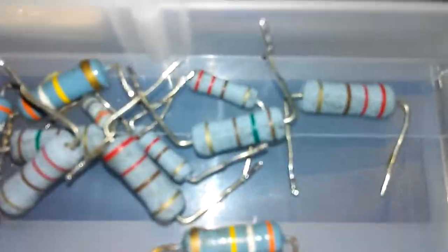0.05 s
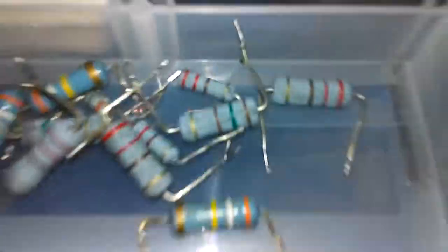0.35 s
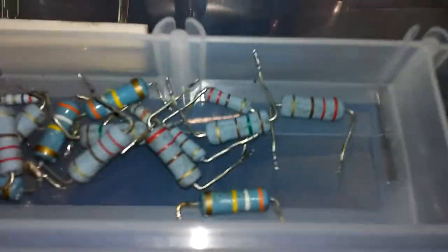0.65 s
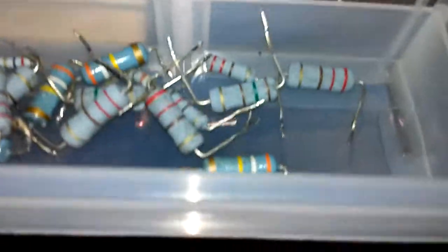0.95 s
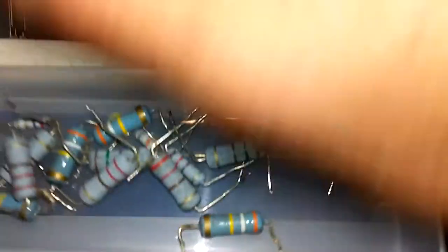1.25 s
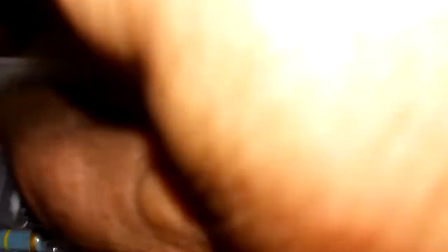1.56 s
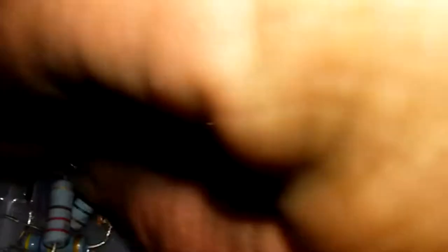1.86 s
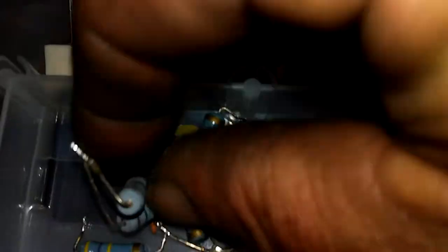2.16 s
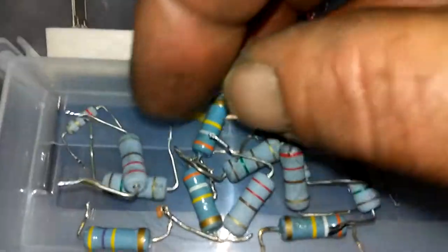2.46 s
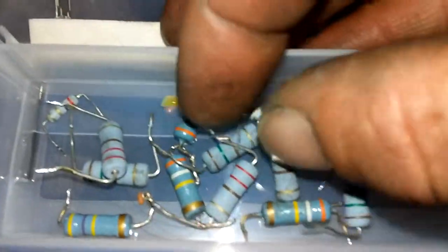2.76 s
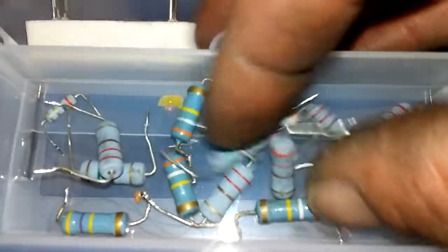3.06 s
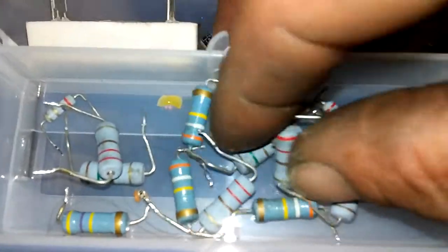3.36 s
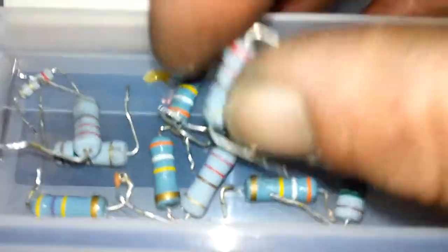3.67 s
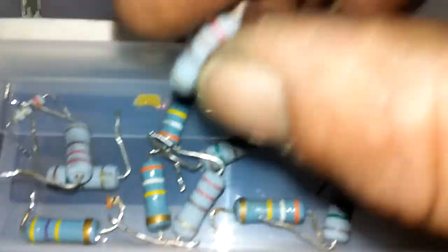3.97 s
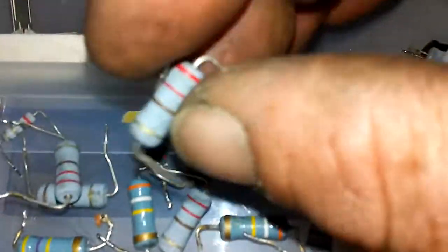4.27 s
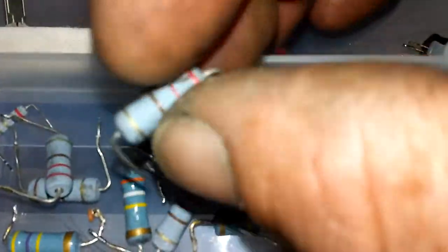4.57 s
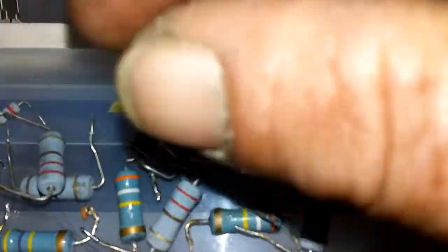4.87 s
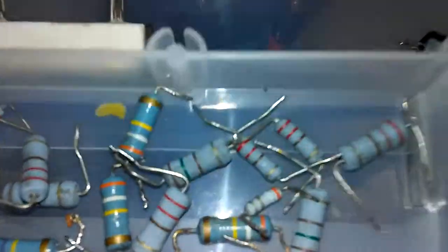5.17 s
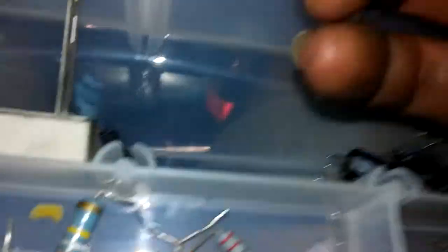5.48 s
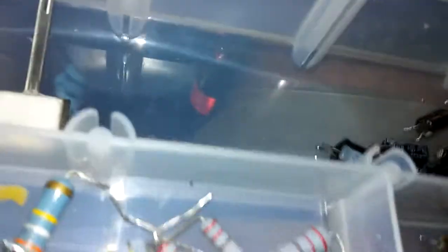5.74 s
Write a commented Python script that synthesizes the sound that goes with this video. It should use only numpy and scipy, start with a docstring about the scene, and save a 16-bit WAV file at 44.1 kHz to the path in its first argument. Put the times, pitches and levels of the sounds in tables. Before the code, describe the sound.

Fingers stir ceramic resistors in a small plastic box, making close clicks, rattles and wiry scratches, then one drops back in.

```python
"""First you hear a low, fan-like drone in a small room, with a faint hiss. Then fingers sort through
ceramic resistors in a small plastic box, close to the microphone. The resistors knock on each other
and make the box ring, their wire leads scratch and buzz, and the box thuds softly on the table.
At the end one resistor is dropped back and bounces."""
import sys
import numpy as np
from scipy import signal
from scipy.fft import rfft, irfft, next_fast_len
from scipy.io import wavfile

SR = 44100
rng = np.random.default_rng(int(sys.argv[2]) if len(sys.argv) > 2 else 0)


def transcribe(signal):
    """Save signal, clipped to [-1, 1], as a 16-bit WAV file at the path in sys.argv[1]."""
    frames = np.atleast_2d(signal).T
    limited = np.clip(frames, -1, 1)
    pcm = np.round(limited * 32767).astype(np.int16)
    wavfile.write(sys.argv[1], SR, pcm)


N = 265041
TIME = np.arange(N) / SR


def from_db(db):
    """Turn decibels into a number to multiply by."""
    return np.exp(np.asarray(db) * (np.log(10) / 20))


def rms_one(x):
    """Scale a sound so that its average level (rms) is one."""
    return x / np.sqrt(np.mean(x ** 2) + 1e-20)


def level_curve(rows):
    """Join points of (seconds, dB) into a gain for every sample."""
    return from_db(np.interp(TIME, *np.transpose(rows)))


def add(out, start_s, sound):
    """Mix a sound in at a given time."""
    start = int(round(start_s * SR))
    out[start:start + len(sound)] += sound[:N - start]


def band(x, low_hz, high_hz):
    """Keep what lies between two frequencies."""
    return signal.sosfilt(signal.butter(3, [low_hz, high_hz], "band", fs=SR, output="sos"), x)


def noise(spectrum, size):
    """Noise of level one, coloured by points of (Hz, dB)."""
    hz, db = np.transpose(spectrum)
    padded = next_fast_len(size)
    bins_hz = np.maximum(np.fft.rfftfreq(padded, 1 / SR), 1)
    colour = from_db(np.interp(np.log(bins_hz), np.log(hz), db))
    return rms_one(irfft(rfft(rng.standard_normal(padded)) * colour, padded)[:size])


def fade(t, t60):
    """Die away by 60 dB in t60 seconds."""
    return np.exp(-np.log(1000) * t / t60)


def ring(clicks, hz, t60):
    """Each click starts a pure tone that dies away."""
    decay, angle = from_db(-60 / (t60 * SR)), 2 * np.pi * hz / SR
    return signal.lfilter([0, np.sin(angle)], [1, -2 * decay * np.cos(angle), decay ** 2], clicks + 1e-18)


# The colour of the hiss. Each row: frequency in Hz, relative level in dB.
HISS_COLOUR = [(100, -2.5), (2000, 3), (4000, -1.5), (6700, -3), (8500, -8.5), (10000, -8), (12500, -4.5),
               (15500, -4), (17000, -21)]


def hiss(level_db):
    """The microphone adds a steady hiss of its own."""
    return from_db(level_db) * noise(HISS_COLOUR, N)


# The colour of the drone. Each row: frequency in Hz, relative level in dB.
DRONE_COLOUR = [(20, -23), (40, -18), (65, -3), (100, -3), (160, -1.5), (205, 0.5), (255, 5), (310, -7),
                (380, -4.5), (550, -11.5), (800, -12.5), (1500, -21), (3000, -46.5), (8000, -55)]
# How loud the drone and its hum are. Each row: time in seconds, level in dB.
DRONE_LEVELS = [(0, -54), (.8, -52.5), (2, -51), (3.8, -51), (4.85, -52.5), (5.2, -48), (5.6, -49),
                (6, -46.5)]
HUM_LEVELS = [(0, -53), (.3, -55), (.5, -60), (1, -56), (2, -67.5), (4.5, -66), (5.3, -51), (6, -70.5)]


def room_drone(hum_hz, waver_hz):
    """A low, fan-like rush, with a band of noise so narrow that it sounds like a wavering hum."""
    rush = noise(DRONE_COLOUR, N)
    hum = band(rng.standard_normal(N + SR), hum_hz - waver_hz, hum_hz + waver_hz)
    hum = rms_one(hum[SR:])   # skip the second in which it builds up
    return level_curve(DRONE_LEVELS) * rush + level_curve(HUM_LEVELS) * hum


# The colour of the echoes. Each row: frequency in Hz, relative level in dB.
ECHO_COLOUR = [(200, 21), (600, 1), (1200, 6), (2200, 1), (4000, 10), (7000, -1), (11000, -2.5),
               (16000, -8)]


def echoes(x, near_db, near_t60, room_db, room_t60, size=18000):
    """Sound bounces quickly off the box and the table, then lingers faintly in the room."""
    t = np.arange(size) / SR
    arrival = np.clip(t / 0.0014 - 1, 0, 1)   # nothing comes back for 1.4 ms
    response = 0
    for db, t60 in ((near_db, near_t60), (room_db, room_t60)):
        tail = noise(ECHO_COLOUR, size) * fade(t, t60) * arrival
        response += from_db(db) * tail / np.linalg.norm(tail)
    return signal.fftconvolve(x, response)[:N]


# Thuds of the box. Each row: start in seconds, peak level in dB, lowest and highest frequency in Hz.
BUMPS = [(1.134, -37, 200, 410), (1.243, -36, 400, 557), (1.51, -32.5, 74, 312), (1.865, -35, 135, 280),
         (2.352, -43, 74, 260), (3.209, -33, 19, 188)]


def box_bumps(t60, size=6000):
    """A finger pushes the whole box against the table: a soft, dull thud."""
    out, t = np.zeros(N), np.arange(size) / SR
    for start_s, db, low_hz, high_hz in BUMPS:
        thud = band(rng.standard_normal(size) * fade(t, t60), low_hz, high_hz)
        add(out, start_s, from_db(db) * thud / np.abs(thud).max())
    return out


# Thin, bright tings. Each row: start in seconds, pitch in Hz, level in dB, ring time in seconds.
TINGS = [(1.554, 5300, -16, 0.027), (1.554, 6300, -18, 0.048), (1.718, 12700, -42, 0.078),
         (2.004, 10200, -50, 0.21), (2.025, 6820, -37, .12), (2.305, 9360, -59, 0.37),
         (2.816, 13900, -49, .09), (2.836, 13500, -48, .08), (3.192, 6960, -27, 0.027),
         (3.34, 5900, -52, 0.023), (4.93, 6700, -14, 0.013), (4.929, 11650, -29.5, 0.019),
         (4.942, 10700, -41.5, 0.057), (4.961, 9600, -50, 0.022)]


def bright_tings(buzz_hz, size=9000):
    """Narrow bands of fading noise: buzzing wires and the sharp top of the dropped resistor's bounces."""
    out, t = np.zeros(N), np.arange(size) / SR
    for start_s, hz, db, t60 in TINGS:
        ting = rms_one(band(rng.standard_normal(size), hz - buzz_hz, hz + buzz_hz))
        add(out, start_s, from_db(db) * ting * fade(t, t60))
    return out


# The heap rustling under resting fingers. Each row: time in seconds, level in dB, brightness in dB.
RUSTLE = [(0.95, -75.5, -10), (1.11, -49.5, -7), (1.3, -54.5, -10), (1.55, -47, -7), (1.75, -49, -4),
          (1.98, -40.5, -4), (2.32, -40, -5.5), (2.57, -57, -9), (2.84, -42.5, -8), (2.99, -58, -11),
          (3.2, -54.5, -9), (3.55, -49, -5.5), (3.94, -50.5, -10), (4.02, -67, -6), (6, -66, -6)]
# Short bursts of scraping: finger pushes and the rattle of the dropped resistor.
# Each row: start and length in seconds, level in dB, brightness in dB.
SCRAPES = [(1.146, .045, -42, -5), (1.335, .016, -39, -17), (1.405, 0.022, -39.5, -7),
           (1.439, .035, -30.5, -10), (1.503, .075, -24.5, -4.5), (1.584, 0.017, -39, 7),
           (1.665, .018, -38, -10), (1.71, .02, -35, -12), (2.089, .035, -33, -7.5), (2.193, .042, -26, -4),
           (2.335, .1, -32.5, -5), (2.678, .05, -38, -17), (2.738, .03, -28.5, -9.5), (2.783, .02, -38, -3),
           (2.824, .036, -27.5, -5.5), (3.062, .016, -44.5, -9.5), (3.093, .012, -35, -15),
           (3.176, .047, -27, -7), (3.292, 0.02, -32.5, 0.5), (3.345, .03, -38, -3),
           (3.421, 0.03, -30.5, -6), (3.473, .026, -38, -2), (3.569, .048, -36, -5.5),
           (3.631, .035, -32.5, -13), (3.738, .024, -30.5, -16), (4.326, 0.087, -52.5, -8),
           (4.466, .055, -51, -1.5), (4.926, .036, -36.5, -6), (5.227, 0.039, -50.5, -2),
           (5.304, .05, -55, -3), (5.572, .05, -51, -3.5), (5.817, .05, -50, -3), (5.9, .09, -52, -15)]


def stirring(rise_db_per_s, fall_db_per_s, points=6000):
    """Level and brightness of the rubbing, in dB: scrapes rise fast and fade slower, over the rustle."""
    t = np.linspace(0, TIME[-1], points)
    times, *columns = np.transpose(RUSTLE)
    rustle_db, rustle_bright_db = [np.interp(t, times, column) for column in columns]
    power, treble = from_db(rustle_db) ** 2, from_db(rustle_db + rustle_bright_db) ** 2
    for start_s, length_s, db, bright_db in SCRAPES:
        drop_db = np.maximum(rise_db_per_s * (start_s - t), fall_db_per_s * (t - start_s - length_s))
        scrape = from_db(db - np.clip(drop_db, 0, 100)) ** 2
        power += scrape
        treble += scrape * from_db(bright_db) ** 2
    return [np.interp(TIME, t, 10 * np.log10(curve)) for curve in (power, treble / power)]


# Where the box floor, the walls and the ceramic ring. Each row: lowest and highest pitch in Hz.
ZONES = [(400, 1400), (1400, 3000), (3000, 16000)]
# The filled box's own tones (modes). Each row: pitch in Hz, relative level in dB, ring time in seconds.
BOX_MODES = [(450, -18.5, 0.025), (615, -11, 0.12), (693, -9.5, 0.027), (766, -8, 0.025),
             (1084, 6.5, 0.019), (1257, 11, 0.015), (1562, 8, 0.011), (1785, 1, 0.02), (1981, 0, 0.032),
             (2254, 3, 0.019), (2450, -4.5, 0.04), (2930, -14.5, 0.016), (3000, 11.5, 0.0052),
             (3587, 2.5, 0.017), (4360, 0, 0.016), (4710, -1.5, 0.0079), (5170, -12.5, 0.026),
             (5470, -1, 0.0047), (6050, 1.5, 0.012), (6830, -9.5, 0.021), (6840, -2, 0.011),
             (6800, -3.5, 0.016), (8000, -1.5, 0.0052), (9530, -7.5, 0.0065), (9620, -18.5, 0.0051),
             (12500, -18.5, 0.0049), (13800, -17.5, .008)]


def modes_in(low_hz, high_hz):
    """The tones that belong to one zone."""
    return [mode for mode in BOX_MODES if low_hz <= mode[0] < high_hz]


def nearness_db(hz, spot_hz, db_per_octave):
    """A wall's tones ring most when they lie near the pitch of the touched spot."""
    low, high = ZONES[1]
    octaves_away = np.abs(np.log2(hz / np.clip(spot_hz, low, high)))
    return -db_per_octave * octaves_away * (low <= hz < high)


def scratching(stir_db, bright_db, catches_per_s, friction_db, floor_db, walls_db, ceramic_db,
               finger_damping, points=120, jerks=1300):
    """Wires and resistors slip over the plastic in tiny catches, with a fine rubbing hiss between."""
    moments = np.linspace(0, TIME[-1], points)
    spot_hz = np.interp(moments, *np.transpose(KNOCKS)[:2])   # the fingers rub where they knock
    caught = rng.random(N) < catches_per_s / SR
    catches = caught * from_db(3.5 * np.minimum(rng.exponential(1, N), 3))
    # the heap gives way in little jerks, so the catches come in clumps
    clumps = np.interp(TIME, np.linspace(0, TIME[-1], jerks), rng.standard_normal(jerks))
    force = (rms_one(catches) + from_db(friction_db)) * from_db(3 * np.clip(clumps, -2, 2))
    out = np.zeros(N)
    for (low, high), zone_db in zip(ZONES, (floor_db, walls_db, ceramic_db + bright_db)):
        zone = 0
        for hz, db, t60 in modes_in(low, high):
            wander_db = 2.8 * rng.standard_normal(points)   # tones swell and fade as the contacts move
            wire_db = 3.5 * max(np.log2(hz / 6000), 0)   # thin wires favour the highest tones
            gain = from_db(db + wire_db + wander_db + nearness_db(hz, spot_hz, db_per_octave=5.5))
            tone = ring(force * rng.standard_normal(N), hz, t60 / finger_damping)
            zone += np.interp(TIME, moments, gain) * tone
        out += from_db(stir_db + zone_db) * rms_one(band(zone, low, high))
    return out


def jostles(stir_db, count, centre_hz, still_db):
    """Small chance knocks, as rows like KNOCKS: harder stirring makes them likelier and louder."""
    stillness_db = np.minimum(stir_db - still_db, 0)   # under a light touch the heap lies still
    chance = np.cumsum(from_db(0.5 * stir_db + stillness_db))
    times = np.interp(rng.random(count), chance / chance[-1], TIME)
    pitch, strength, hardness = np.clip(rng.standard_normal((count, 3)), -2, 2).T
    spot_hz = centre_hz * 2 ** (0.27 * pitch)
    knock_db = -7.5 + 0.79 * np.interp(times, TIME, stir_db) + 2 * strength
    tick_db = -5.5 + 2.5 * hardness
    return np.column_stack([times, spot_hz, knock_db, tick_db])


def chatter(times, sounds, gap_s=0.0038, loss_db=12.5, touches=3):
    """A resistor rattles against what it hit: quick, uneven touches, each weaker than the last."""
    out = np.zeros(N)
    for start_s, sound in zip(times, sounds):
        for touch, stretch in enumerate(rng.uniform(.5, 1.5, touches)):
            add(out, start_s, from_db(-loss_db * touch) * sound)
            start_s += gap_s * stretch
    return out


# Resistors hitting the box and each other. Each row: start in seconds, pitch of the struck spot in Hz,
# relative level in dB, and how many dB the ceramic's tick lies above that level.
KNOCKS = [(0.5692, 900, -47, 0.5), (0.6291, 1020, -32, -10), (0.6965, 1720, -63, 13.5),
          (0.766, 1720, -59, 6.5), (1.0412, 1120, -40, -13), (1.091, 1550, -37, -16),
          (1.1263, 1187, -29.5, -36), (1.142, 1210, -27, -32), (1.1533, 1580, -22.5, -42.5),
          (1.1738, 1810, -29.5, -18), (1.198, 1700, -22.5, -27.5), (1.204, 1740, -28, -33),
          (1.2452, 613, -35, -34), (1.2587, 510, -38.5, -25), (1.3112, 905, -37, -28.5),
          (1.3433, 1534, -23.5, -27), (1.441, 1940, -26, -12), (1.4913, 1850, -24, -32.5),
          (1.5116, 1260, -24.5, 0.5), (1.529, 1760, -16.5, -32), (1.5546, 1900, -17, 4.5),
          (1.5664, 1560, -18.5, -16.5), (1.5807, 1840, -36.5, -23), (1.7106, 1860, -25.5, -12),
          (1.7183, 1860, -19.5, -4.5), (1.7302, 1960, -28.5, -8), (1.8321, 1810, -21, -9.5),
          (1.863, 1520, -24.5, -18), (1.8745, 1730, -29, -2.5), (1.9205, 1940, -30.5, -6.5),
          (1.9609, 1810, -27.5, -7.5), (2.026, 1710, -33, -2), (2.1943, 1780, -25.5, 3),
          (2.2131, 2070, -20.5, -2), (2.3378, 1830, -24, -17), (2.3539, 2000, -15, -5.5),
          (2.3818, 1880, -19, -7), (2.3942, 2080, -16, -12), (2.4047, 2030, -9.5, -8),
          (2.4242, 2110, -16.5, -24), (2.475, 2150, -36, -22), (2.5133, 2050, -36, -27),
          (2.535, 2050, -27.5, -19), (2.6012, 2090, -38, -26), (2.6972, 2020, -32.5, -13),
          (2.7136, 1110, -29, -24.5), (2.8199, 2180, -11, -5.5), (2.8312, 2720, -15.5, 2.5),
          (2.836, 1700, -16.5, -11.5), (2.8512, 2400, -22, -7.5), (2.8784, 2060, -28.5, -4),
          (2.9212, 1240, -34, -19), (2.9874, 1250, -43, -30), (3.0919, 2450, -31, -12),
          (3.0964, 2260, -27, -25), (3.1631, 2320, -37, -8), (3.17, 2370, -26, -18),
          (3.179, 2340, -23, -3.5), (3.1935, 1660, -13.5, -11.5), (3.2135, 1030, -11, -20),
          (3.2218, 690, -27, -15), (3.2695, 1970, -32.5, -13), (3.3097, 2600, -31, -12),
          (3.34, 2060, -24, -1.5), (3.367, 2440, -30, -6), (3.5341, 2070, -32.5, -5),
          (3.5829, 2500, -23, -15), (3.6328, 2370, -23, -15), (3.651, 2210, -21.5, -9),
          (3.7347, 2280, -22.5, -5), (3.7489, 2340, -20, -8.5), (3.813, 2300, -39.5, -10),
          (4.1486, 1560, -49, -9), (4.407, 1500, -43.5, -24), (4.708, 1290, -51, -4.5),
          (4.9224, 1910, -37.5, -6), (4.93, 2110, -17.5, -1), (4.9411, 2300, -13, -3),
          (4.9801, 2360, -18.5, -11.5), (5.6844, 2290, -44, -1.5)]


def resistor_knocks(rows, level_db, crack_db, crack_t60, spot_db, swell_s, box_detune, ceramic_detune,
                    even_hz=1280, size=1600):
    """Each knock lands on another spot, so it rings the tones of the box in its own mix."""
    times, spot_hz, knock_db, tick_db = np.transpose(rows)[:, :, None]
    # spots pitched below even_hz lie on the floor, higher ones on a wall
    depth_db = 23 * np.log2(even_hz / spot_hz)
    floor_db, walls_db = np.minimum(depth_db, 0), np.minimum(-depth_db, 0)
    t = np.arange(size) / SR
    # the plastic under the blow swings up within a few cycles and stops as fast
    swell = (t / swell_s * np.exp(1 - t / swell_s)) ** 2
    spot = from_db(spot_db) * swell * np.sin(2 * np.pi * spot_hz * t)
    # the shifting load detunes the box a little; resistors of unlike size differ more
    detunes = (box_detune, box_detune, ceramic_detune)
    sounds = 0
    for (low, high), zone_db, detune in zip(ZONES, (floor_db, walls_db, tick_db), detunes):
        crack = band(rng.standard_normal((len(times), size)), 1300, 8200) * fade(t, crack_t60)
        zone = from_db(crack_db) * crack + spot * ((low <= spot_hz) & (spot_hz < high))
        for hz, db, t60 in modes_in(low, high):
            strength, side, shift = rng.standard_normal((len(times), 3)).T[:, :, None]
            lift_db = max(np.log2(hz / 4000), 0)   # the highest tones gain 1 dB per octave
            gain = from_db(db + lift_db + 3 * strength + nearness_db(hz, spot_hz, db_per_octave=22))
            tone = np.sign(side) * np.sin(2 * np.pi * hz * (1 + detune * shift) * t)
            zone += gain * tone * fade(t, t60)
        zone = band(zone, low, high)
        attack_rms = np.sqrt(np.mean(zone[:, :200] ** 2, axis=1, keepdims=True))
        sounds += zone * from_db(level_db + knock_db + zone_db) / attack_rms
    return chatter(times[:, 0], sounds)


def microphone(x, knee_hz, top_db):
    """The microphone picks up the highest sounds a little more weakly."""
    corners_hz = [0, knee_hz, knee_hz + 900, SR / 2]
    response = signal.firwin2(41, corners_hz, from_db([0, 0, top_db, top_db]), fs=SR)
    return np.convolve(x, response, "same")


def scene():
    """Fingers stir the box on its table, over the drone of the room."""
    stir_db, bright_db = stirring(rise_db_per_s=3995, fall_db_per_s=601.5)
    small_knocks = jostles(stir_db, count=55, centre_hz=1950, still_db=-46)
    knocks = resistor_knocks(np.vstack([KNOCKS, small_knocks]), level_db=-0.65, crack_db=1.5,
                             crack_t60=0.019, spot_db=8.5, swell_s=0.001,
                             box_detune=0.042, ceramic_detune=0.084)
    scratches = scratching(stir_db, bright_db, catches_per_s=950, friction_db=-7.5,
                           floor_db=-8.5, walls_db=-1.5, ceramic_db=-3, finger_damping=1.56)
    box = microphone(knocks + scratches, knee_hz=7360, top_db=-3) + bright_tings(buzz_hz=450)
    box += echoes(box, near_db=-13.5, near_t60=0.075, room_db=-36.5, room_t60=0.24)
    background = room_drone(hum_hz=305.7, waver_hz=10) + hiss(level_db=-61.5)
    return (background + box_bumps(t60=0.036) + box)[None]


def record(dry):
    """Round off the loudest peaks and cut the treble above 16000 Hz."""
    rounded = dry / (1 + (dry / .88) ** 6) ** (1 / 6)
    return signal.sosfilt(signal.ellip(10, .2, 70, 16000, fs=SR, output="sos"), rounded)


dry = scene()
out = record(dry)
transcribe(out)
```